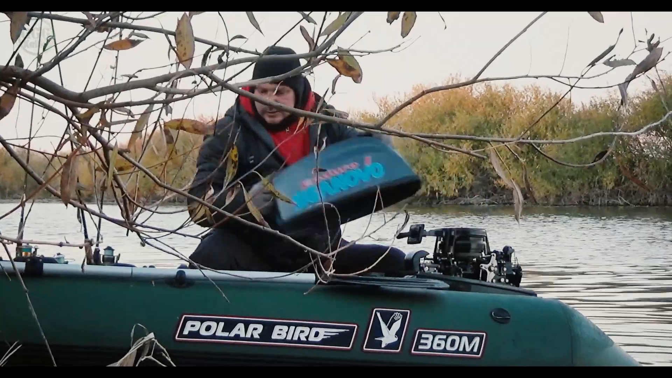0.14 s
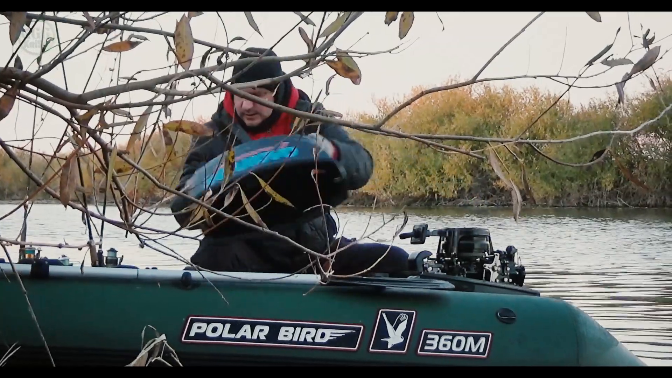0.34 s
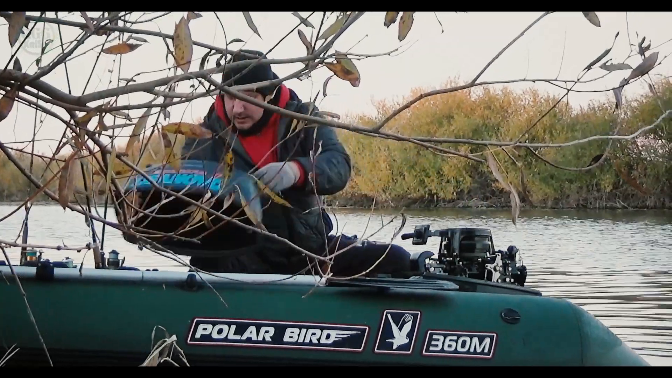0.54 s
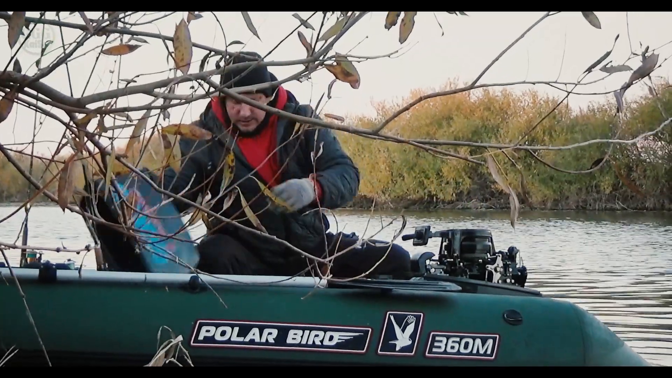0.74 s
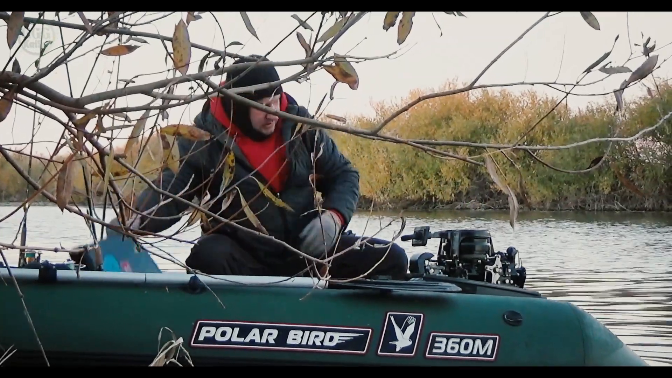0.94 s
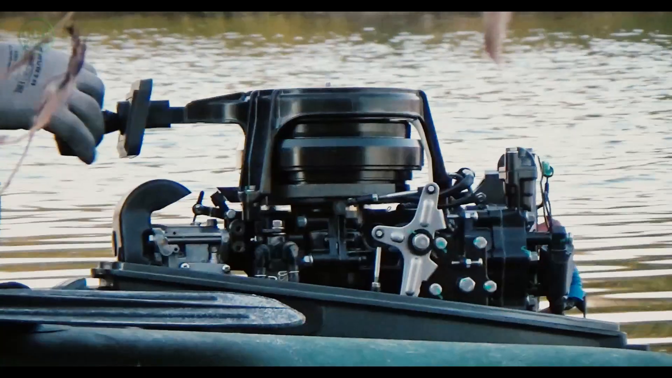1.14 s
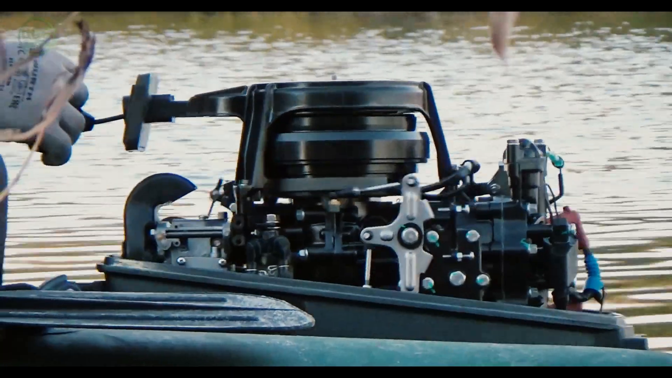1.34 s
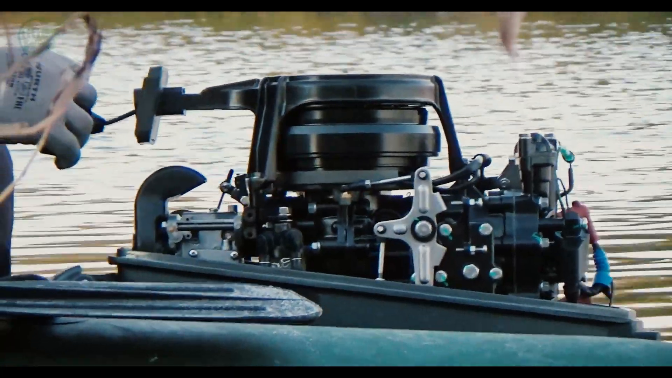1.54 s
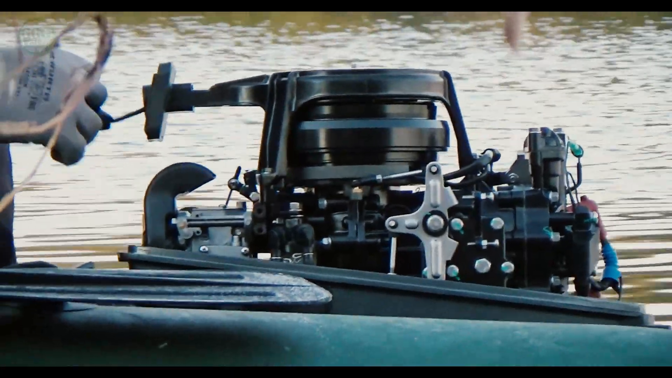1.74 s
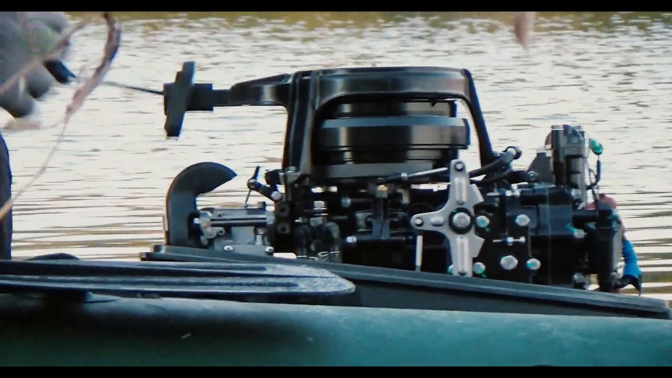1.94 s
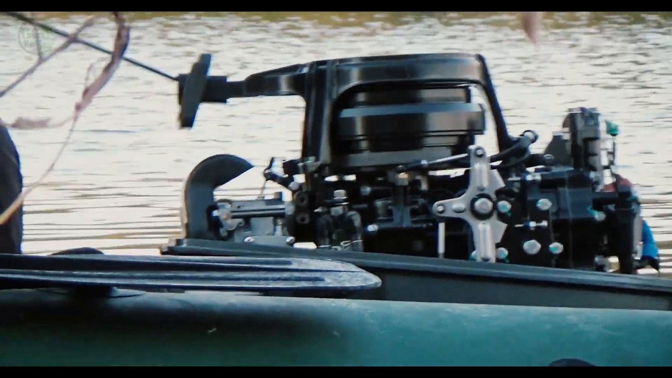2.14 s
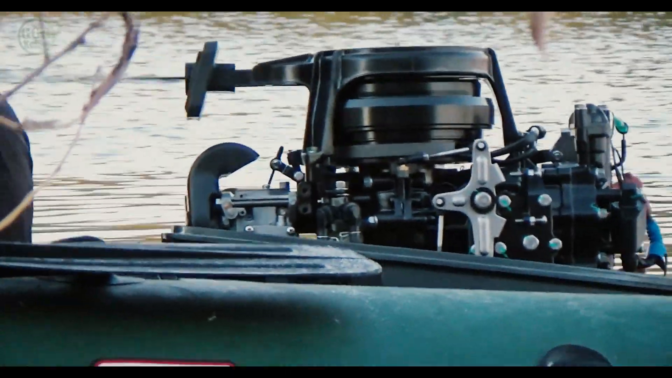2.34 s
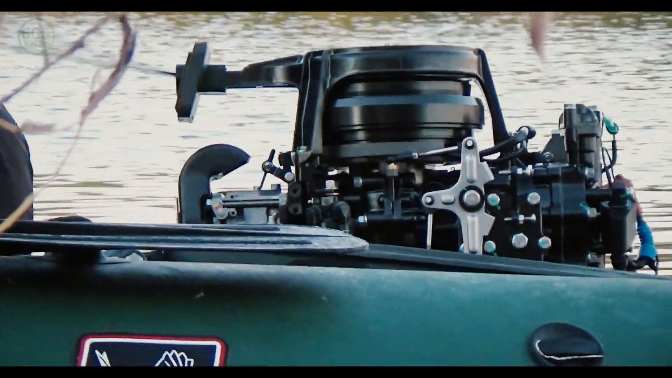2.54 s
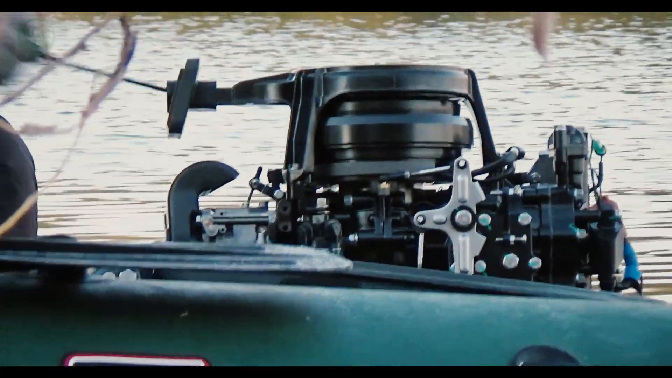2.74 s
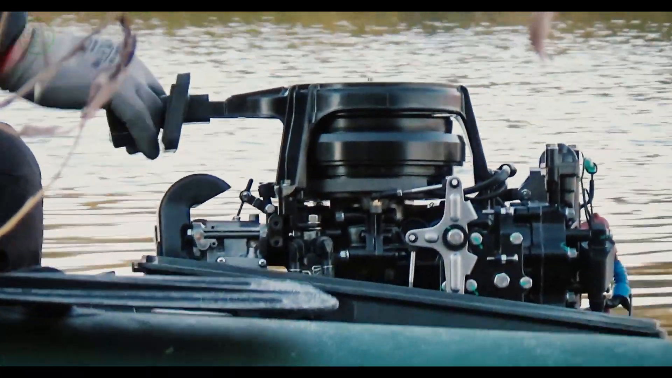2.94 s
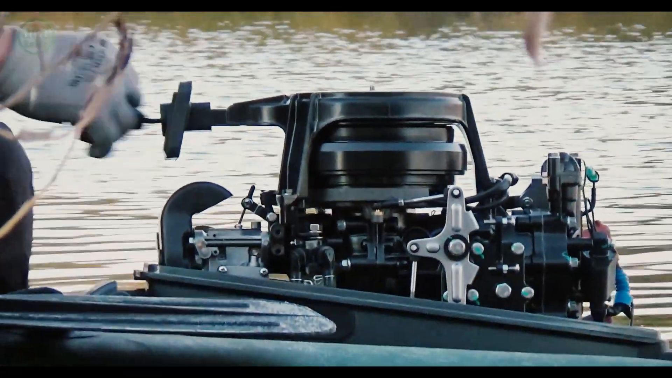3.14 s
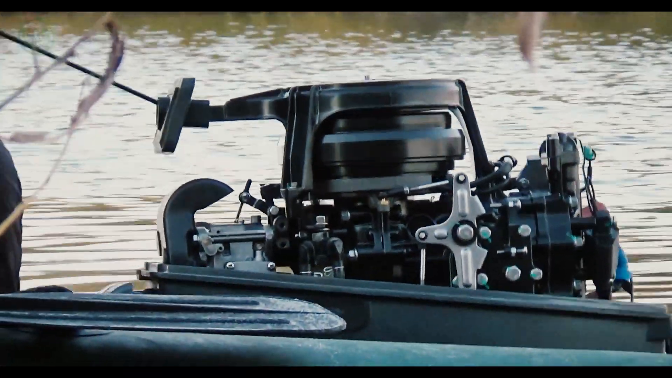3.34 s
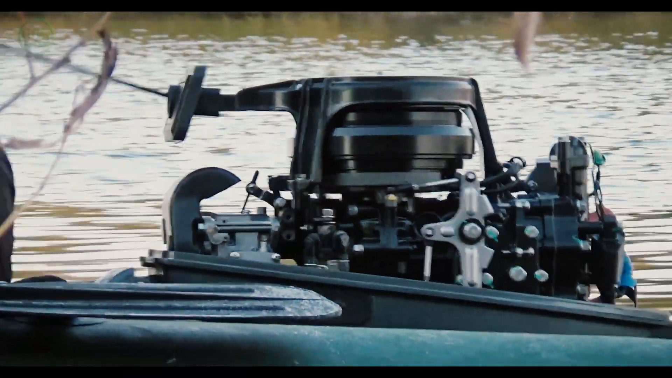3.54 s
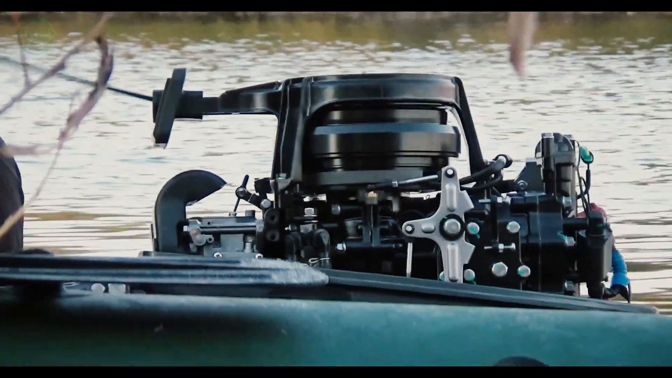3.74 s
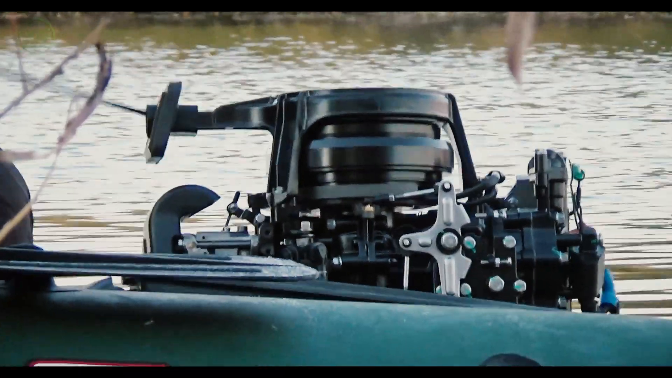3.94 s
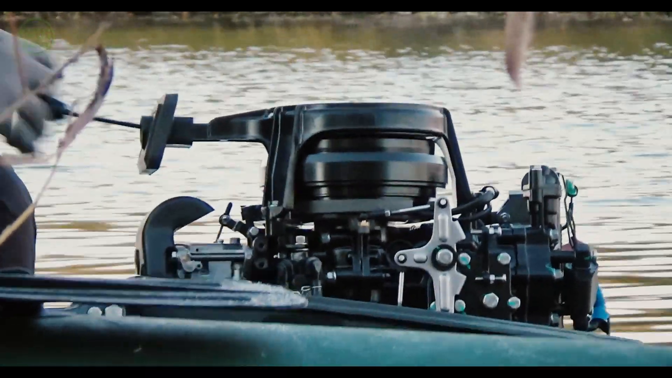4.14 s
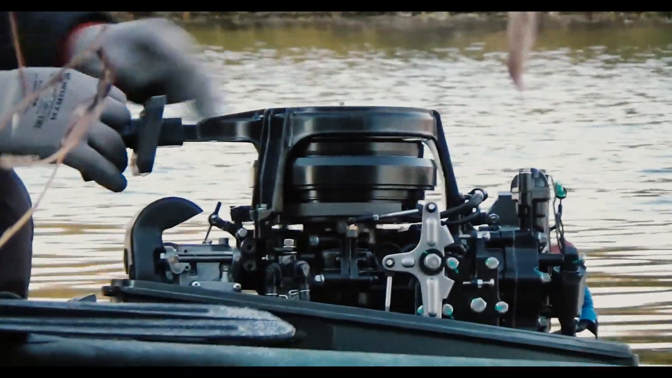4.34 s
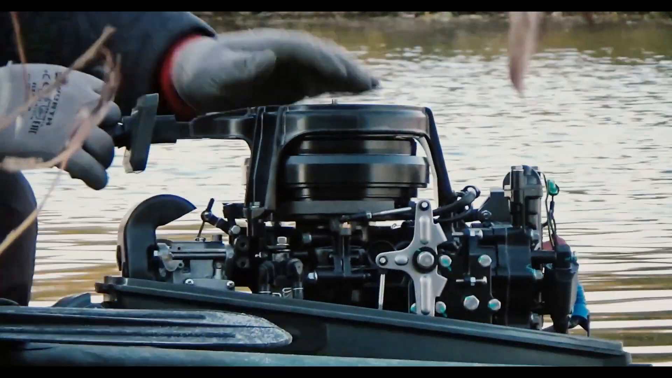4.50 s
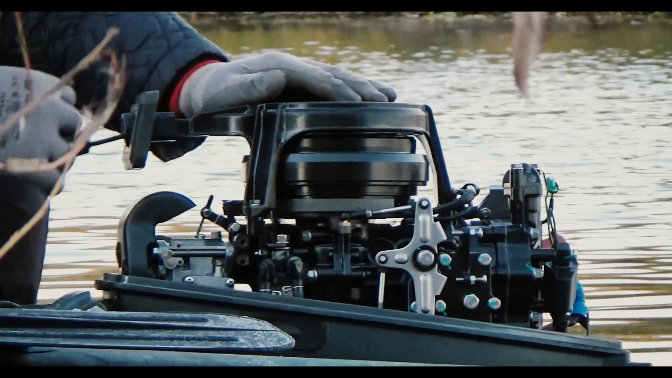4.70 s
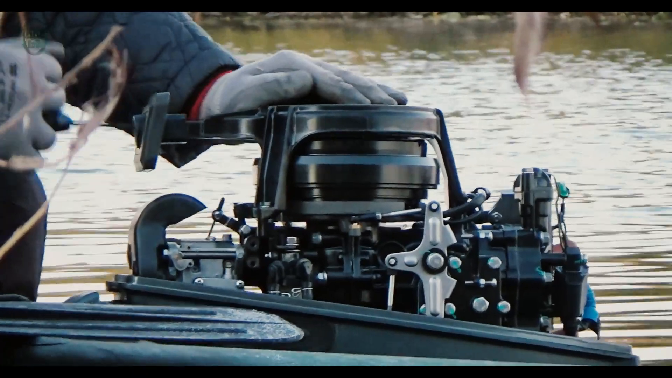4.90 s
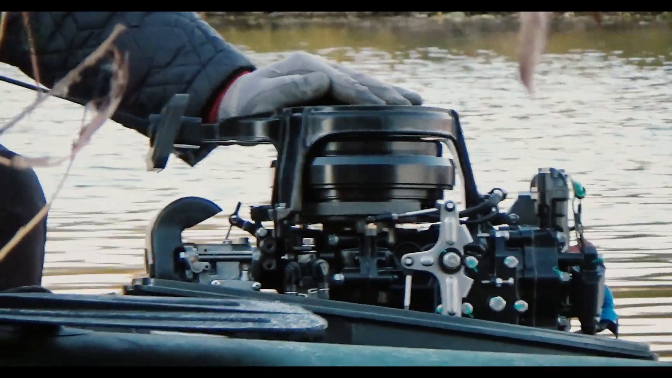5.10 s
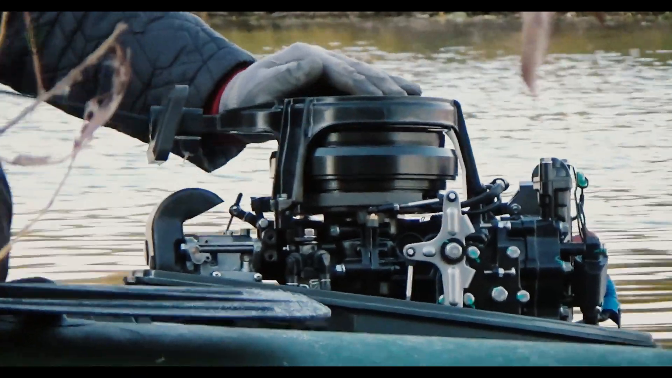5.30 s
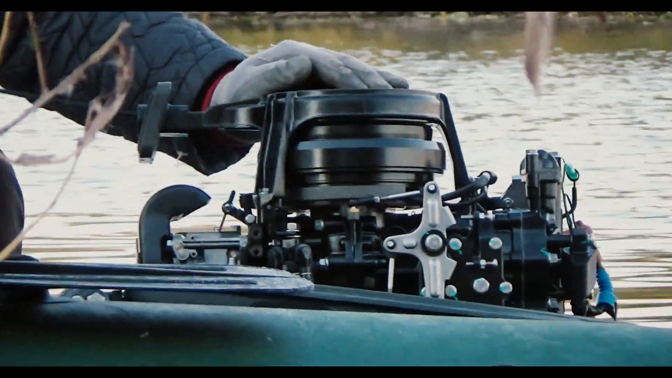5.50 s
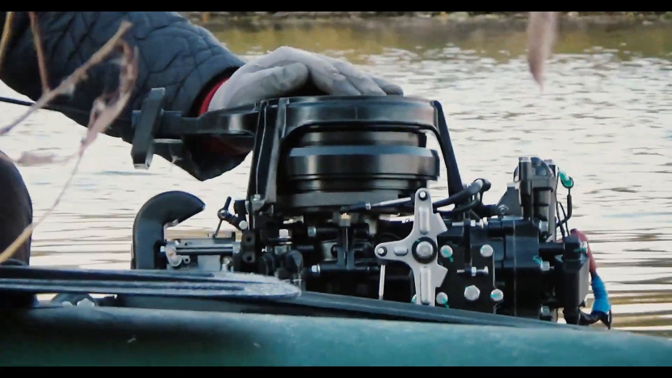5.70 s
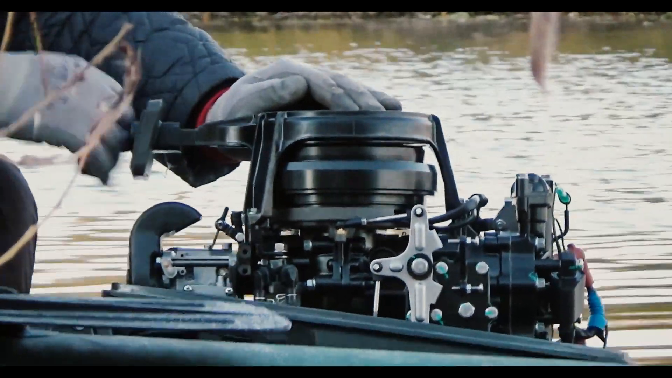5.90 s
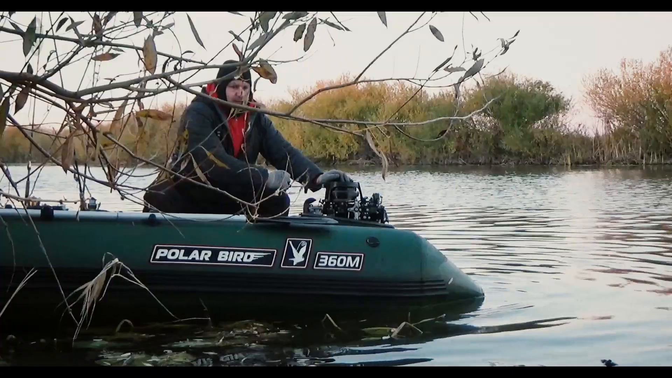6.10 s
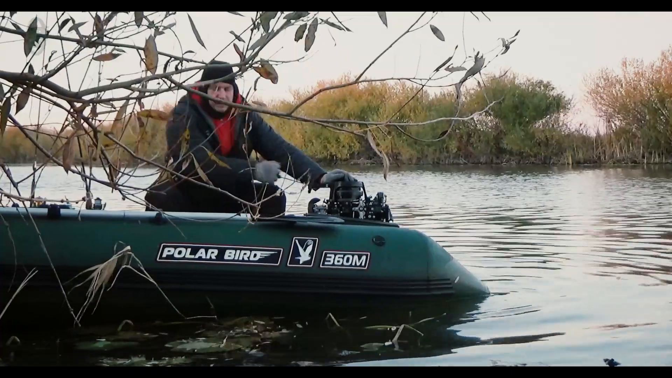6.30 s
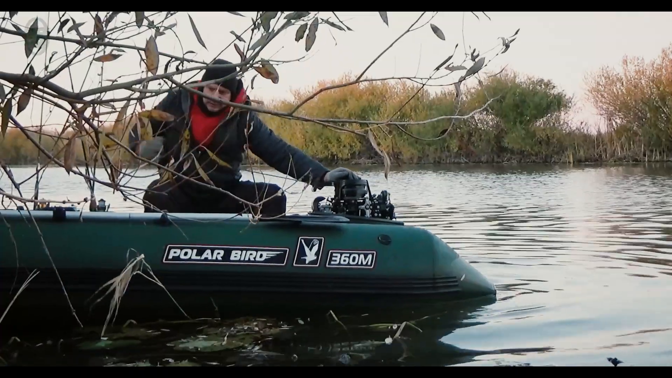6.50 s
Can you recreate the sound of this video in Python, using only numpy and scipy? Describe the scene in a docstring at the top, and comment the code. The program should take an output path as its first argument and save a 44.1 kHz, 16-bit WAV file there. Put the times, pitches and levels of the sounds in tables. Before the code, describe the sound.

Close outdoors by water, with almost no echo: jacket cloth rustles, rope ticks tight, then four gritty starter pulls follow, each ending in a bright metallic snap over compression and a rattling, weakening rewind. A hard plastic handle knock comes after the first pull, lighter knocks and clicks after the second. Loose linkages rattle, but there is no ignition, only faint river hush underneath.

```python
"""A jacket sleeve swishes over the hush of a river bank, then a small outboard motor on an inflatable boat,
its cowl laid aside, is turned over slowly by the starter rope: four pulls, and it never fires.
On each pull the rope rasps off its reel (random slips), the crank clacks and steel snaps (damped modes
and noise cracks), and air puffs hollowly through the cylinder (resonant noise).
The reel whirrs the rope back on a low, pulsing note; the rope handle knocks on the housing."""
import sys
import numpy as np
from scipy import signal
from scipy.fft import rfft, irfft, next_fast_len
from scipy.io import wavfile
from scipy.ndimage import uniform_filter1d, map_coordinates

SR = 44100
rng = np.random.default_rng(int(sys.argv[2]) if len(sys.argv) > 2 else 0)


def materialize(psi):
    """Save the field psi as 16-bit PCM at rate SR to the path in sys.argv[1].

    A 1-D psi becomes a single channel; in a 2-D psi each row is a channel.
    """
    bounded = np.clip(np.atleast_2d(psi).T, -1, 1)
    quanta = np.round(bounded * 32767).astype(np.int16)
    wavfile.write(sys.argv[1], SR, quanta)


N = 293706  # samples in the scene
HIT = SR // 3  # samples in one blow

# pulls on the rope: [t/s of compression, effort level/dB, snap level/dB, rebound delay/s, rewind length/s,
# reel turn/s, reel note f/Hz, note level/dB while drawn, on first turn back, its change per turn/dB]
PULLS = [(2.376, -1, -12.5, 0.015, 0.78, 0.11, 308.7, -60, -47.5, -4.5),
         (3.643, 2, -11, 0.016, 0.743, .119, 325, -55, -56.5, 4.5),
         (5.409, -0.5, -15, .023, 0.59, .106, 322, -62, -45, -6),
         (6.72, -3, -15, .018, .7, 0.103, 324.3, -49, -50, -4)]
# the rewinding reel first whirrs this long after compression (s), then once a turn
FIRST_TURN_S = 0.161
# gentle tugs that take up slack in the rope: [t/s of the peak, level/dB, half length/s]
TUGS = [(1.27, -63.5, .055), (1.37, -55.5, 0.039), (1.65, -67, 0.62), (2.09, -70, 0.1),
        (3.27, -59.5, 0.065), (4.27, -65.5, 0.052), (4.56, -61.5, 0.21), (5.08, -62.5, 0.13),
        (6.07, -60.5, 0.017), (6.35, -73.5, 0.059)]
# spectrum of the crack of a blow in the crank: [f/Hz, level/dB per Hz]
CRANK_CRACK = [(80, -16), (400, -12), (800, -7.5), (1050, -18.5), (1550, 2), (2600, -3.5), (3600, -10.5),
               (6000, -15.5), (9000, -8), (12000, -25.5), (16000, -45.5)]
# spectrum of the rasping rope: [f/Hz, level/dB per Hz]
ROPE = [(500, -38), (2000, -8.5), (3200, -3.5), (5500, -3.5), (7000, -1.5), (9300, -1.5), (10500, -7.5),
        (12500, -12), (16000, -23)]


def amp(db):
    """Decibels to gain."""
    return 10 ** (np.asarray(db) / 20)


def unit(x):
    """Scaled to rms 1."""
    return x / np.sqrt(np.mean(x ** 2) + 1e-20)


def along(points, hz):
    """(Hz, value) points read on a log axis."""
    f, v = np.transpose(points)
    return np.interp(np.log(hz + 1), np.log(f + 1), v)


def wobble(rate):
    """A smooth random curve, rate knots a second."""
    knots = rng.standard_normal(int(N * rate / SR) + 4)
    return map_coordinates(knots, [np.arange(N) * rate / SR])


def filtered(x, response):
    """x times a response of frequency."""
    n = x.shape[-1]
    m = next_fast_len(n + 8192)  # room for the filter to ring out
    return irfft(rfft(x, m) * response(np.fft.rfftfreq(m, 1 / SR)), m)[..., :n]


def coloured(x, spectrum):
    """x given a spectrum, at rms 1."""
    return unit(filtered(x, lambda hz: amp(along(spectrum, hz))))


def resonance(hz, centre, width):
    """Response of one causal resonance."""
    return 1j * hz * width / (centre ** 2 - hz ** 2 + 1j * hz * width)


def shelf(x, corner_hz, low_db=0, high_db=0):
    """Separate gains below and above a corner."""
    low = signal.sosfilt(signal.butter(1, corner_hz, fs=SR, output="sos"), x)
    return amp(low_db) * low + amp(high_db) * (x - low)


def add(track, s, sound):
    """Mixes a sound into the track at time s."""
    part = track[max(round(s * SR), 0):][:len(sound)]
    part += sound[:len(part)]


def fade(t60):
    """Envelope of a blow: a very quick rise and an exponential fall."""
    t = np.arange(HIT) / SR
    return np.exp(-np.log(1000) * t / t60) * (1 - np.exp(-t / .0002))


def ring(modes, length=1):
    """Damped modes, at new strengths for every blow."""
    t = np.arange(HIT) / SR
    gains = np.array([amp(db + rng.normal(0, 3.6)) for hz, db, t60 in modes])
    waves = [np.sin(2 * np.pi * (hz * t + rng.random())) * fade(t60 * length) for hz, db, t60 in modes]
    return gains @ np.array(waves) / np.linalg.norm(gains)


def crack(spectrum, length):
    """The crowd of short modes in a blow: noise in bands that each die at their own rate."""
    # decay of each band: [f/Hz, t60/s at length 1]
    dying = [(150, 0.071), (600, 0.12), (2000, 0.035), (6000, 0.034), (14000, 0.041)]
    bands, t60s = np.transpose(dying)
    hz = np.fft.rfftfreq(HIT, 1 / SR)
    z = np.exp(2j * np.pi * rng.random(len(hz))) * amp(along(spectrum, hz))
    # overlapping bands that add up to the whole spectrum
    shares = [np.interp(np.log(hz + 1), np.log(bands), row) for row in np.eye(len(bands))]
    parts = irfft([z * share for share in shares], HIT)
    parts = parts / np.sqrt(t60s)[:, None]
    return sum(part * fade(t60 * length) for part, t60 in zip(parts, t60s)) / parts.sum(0).std()


def grains(rate, spread_db):
    """Random tiny slips of uneven size, rate of them a second."""
    sizes = amp(spread_db * np.minimum(rng.standard_exponential(N), 5))
    return unit((rng.random(N) < rate / SR) * sizes * rng.standard_normal(N))


def patchy(x, depth_db):
    """Each moment of a rub wakes some modes more than others."""
    z = signal.stft(x, nperseg=256)[2]
    field = uniform_filter1d(rng.standard_normal(z.shape), size=4, axis=0)  # smooth over frequency
    field = uniform_filter1d(field, size=3, axis=1)  # and over time
    return unit(signal.istft(z * amp(depth_db * unit(field)), nperseg=256)[1][:N])


def chatter(rate, spread_db, cycles):
    """Small slips, each ringing briefly at a pitch of its own."""
    # pitches of the slips: [f/Hz, relative number]
    slip_pitches = [(400, .3), (900, .5), (1100, .2), (1600, 1.6), (2600, 1), (4000, .5), (7000, .9),
                    (9500, 1.4), (12000, .1)]
    t = np.arange(SR // 100) / SR
    when, pick, size, phase = rng.random((int(rate * N / SR), 4)).T
    grid = np.geomspace(slip_pitches[0][0], slip_pitches[-1][0], 200)
    share = np.cumsum(np.abs(along(slip_pitches, grid)))
    hz = np.interp(pick, share / share[-1], grid)[:, None]
    life = cycles / np.sqrt(hz * 2000)  # high slips die sooner
    waves = np.sin(2 * np.pi * (hz * t + phase[:, None])) * t / life * np.exp(-t / life)
    gains = amp(spread_db * np.minimum(-np.log1p(-size), 4))
    at = (when * N).astype(int)[:, None] + np.arange(len(t))
    return unit(np.bincount(at.ravel(), (gains[:, None] * waves).ravel(), N)[:N])


def swell(s, half):
    """A bell-shaped swell round time s."""
    return np.exp(-.5 * np.minimum(((np.arange(N) / SR - s) / half) ** 2, 100))


def swells(rows):
    """Gain of a series of soft movements."""
    return np.sqrt(sum((amp(db) * swell(s, half)) ** 2 for s, db, half in rows))


def stroke(peak_db, start_db, stall_db, sag_db_per_s):
    """Gain of a part moving with the rope: grows with speed, drops at compression, sags as the reel runs back."""
    # before compression: the rope bites, speeds up, is fastest; after it: stalls, runs back and stops
    bite_s, draw_s, fastest_s, stall_s, stop_s = 0.18, 0.26, .062, 0.032, .14
    out, t = np.zeros(N), np.arange(N) / SR
    for s, effort_db, _, _, rewind, *_ in PULLS:
        times = [s - draw_s - bite_s, s - draw_s, s - fastest_s, s + stall_s, s + rewind, s + rewind + stop_s]
        levels = [-45, effort_db + start_db, effort_db, stall_db, stall_db - sag_db_per_s * rewind, -60]
        moving = (t > times[0]) * (t < times[-1])
        out += amp(peak_db + np.interp(t, times, levels)) * moving
    return out


def turns_back(s, turn, count):
    """Times of the first turns of the rewinding reel after compression at s."""
    return [s + FIRST_TURN_S + k * turn for k in range(count)]


def rope_gain():
    """How hard the rope rubs on its guide."""
    pull = stroke(peak_db=-44.0, start_db=-10.5, stall_db=-9.5, sag_db_per_s=4)
    return np.hypot(pull, swells(TUGS))


def case_gain():
    """How hard the crankcase rumbles."""
    pull = stroke(peak_db=-44.5, start_db=-10.0, stall_db=-8.0, sag_db_per_s=15.5)
    return np.hypot(pull, amp(-1) * swells(TUGS))


def hush():
    """The hush of the river bank: coloured noise that drifts slowly in level."""
    # [f/Hz, level/dB per Hz], before the cut in the lows
    hush_spectrum = [(12, -34), (20, -8), (70, -6.5), (113, -14.5), (158, -15.5), (590, -15.5), (2320, -24),
                     (2750, -25.5), (2990, -22.5), (5380, -28), (8650, -26), (14300, -32), (16000, -37)]
    noise = coloured(rng.standard_normal(N), hush_spectrum)
    return shelf(noise, corner_hz=150, low_db=-16.0) * amp(-68.0 + 0.48 * wobble(3))


def sleeve():
    """The sleeve swishes on the jacket: a dense crowd of tiny slips of cloth."""
    # swishes: [t/s of the peak, level/dB, half length/s]
    swishes = [(.05, -77, 0.19), (.98, -67, 0.11)]
    # colour of the cloth: [f/Hz, level/dB per Hz]
    cloth_spectrum = [(500, -15), (3000, -16), (6500, -5), (9500, 4), (12000, -6), (16000, -13)]
    return swells(swishes) * coloured(grains(rate=7700, spread_db=1.0), cloth_spectrum)


def rumble():
    """A low rumble that grows as each pull or tug rocks the boat."""
    spectrum = [(15, -4.0), (30, -3.0), (65, -4.0), (110, -8), (200, -21.5), (400, -37), (2000, -89.5)]
    noise = coloured(rng.standard_normal(N), spectrum)
    pull = stroke(peak_db=-63.5, start_db=-3.5, stall_db=-8.5, sag_db_per_s=6)
    rocking = np.hypot(amp(-79) + amp(-14.5) * swells(TUGS), pull)
    return rocking * noise * unit(amp(3.1 * wobble(14)))


def knocks():
    """The rope handle and other plastic parts knock: housing modes and a crack, ringing longer or shorter."""
    # knocks: [t/s, level/dB, body level/dB, length factor]
    knock_rows = [(.187, -41, -4, 0.49), (1.358, -32, -2.5, 1.34), (1.894, -37, 14, 1.5),
                  (2.842, -26, 6, .6), (3.2753, -11, 2.5, 1.23), (3.278, -18.5, 7, 1), (3.289, -25, 0, .98),
                  (4.1263, -16, -4.5, 0.64), (4.172, -31, -14, 1.9), (4.187, -24.5, -9, .7),
                  (4.204, -26, -12, 0.72), (4.217, -27, -4, 0.66), (4.393, -23.5, -8, 0.62),
                  (5.841, -30.5, -4, 0.78), (5.858, -23.5, -24, 0.52)]
    # ringing of the starter housing: [f/Hz, level/dB, t60/s at length 1]
    housing_modes = [(170, -21, 0.12), (419, -2.5, .075), (614, -1.5, .06), (766, -5, 0.068),
                     (888, -7, 0.06), (1426, 2, 0.054), (1572, -2.5, 0.034), (1710, 1.5, 0.033),
                     (2260, -1.5, 0.056), (2740, -30, .045), (3140, -1.5, 0.062), (3970, -2.5, .055),
                     (4440, -7, 0.032), (8850, 5.5, .025), (9360, -5, 0.037)]
    # crack of the handle: [f/Hz, level/dB per Hz]
    handle_crack = [(60, -40.5), (200, -12.5), (600, -7.5), (1050, -11.5), (1600, -2.5), (3100, -2),
                    (3600, -10.5), (4300, -3), (6000, -7), (9200, -3), (10500, -10.5), (12500, -17.5),
                    (16000, -35)]
    out = np.zeros(N)
    for s, db, body_db, length in knock_rows:
        blow = amp(db - 8) * ring(housing_modes, length) + amp(db - 6) * crack(handle_crack, length)
        add(out, s, shelf(blow, corner_hz=1200, low_db=body_db))
    return out


def scrapes():
    """Short scrapes of rope and handle: band noise that swells and dies within hundredths of a second."""
    # scrapes: [t/s of the peak, level/dB, f/Hz, width as share of f, half length/s]
    scrape_rows = [(0.191, -53, 1700, 1.1, 0.0031), (.407, -69, 8000, .91, 0.021),
                   (1.092, -60, 2500, 1.8, 0.019), (1.696, -57, 5100, 10, 0.018),
                   (2.938, -33, 1600, .64, 0.0073), (3.011, -39, 6500, 2.7, .0052),
                   (3.264, -49.5, 2700, .65, 0.017), (3.337, -41, 8440, 0.41, 0.0075),
                   (4.128, -28, 3070, 0.93, 0.0019), (4.224, -42, 3200, 3.8, .0093),
                   (5.166, -40, 3970, 6.9, .0028), (5.971, -39, 1640, 0.79, 0.0077),
                   (6.013, -41.5, 1650, .9, 0.0082), (6.384, -48.5, 7640, .82, 0.01)]
    out, t = np.zeros(N), np.arange(HIT) / SR
    middle = t.mean()
    for s, db, centre, width, half in scrape_rows:
        def response(hz):
            """A broad resonance with the extreme treble rolled off."""
            return resonance(hz, centre, centre * width) ** 2 / (1 + (hz / 11500) ** 8)
        rub = unit(filtered(rng.standard_normal(HIT), response))
        add(out, s - middle, amp(db) * rub * np.exp(-.5 * ((t - middle) / half) ** 2))
    return out * unit(amp(2.1 * wobble(450)))  # roughness


def ticks():
    """Rope, glove and fittings tick: a decaying sine spike with a faint rattle of the touched part."""
    # ticks: [t/s, level/dB, f/Hz, t60/s of the spike, rattle level/dB re the tick]
    tick_rows = [(.329, -50, 5400, .003, -8), (1.4048, -24, 9900, 0.0011, -20.5),
                 (1.475, -44.5, 3365, .04, -4), (1.593, -44, 9800, .004, -16),
                 (2.028, -47.5, 2730, .003, -0.5), (2.1198, -33, 8500, 0.0023, -19),
                 (2.6, -30, 9000, .0024, -18), (2.668, -34.5, 6350, .0037, -6),
                 (2.852, -30.5, 9240, 0.0072, -1.5), (3.027, -33, 10000, .0037, -8),
                 (3.045, -28.5, 7600, 0.0021, -11), (3.218, -38, 5500, .0085, -7),
                 (3.625, -23, 2780, .005, -22), (3.75, -33.5, 2920, .0036, -0.5),
                 (4.128, -26.5, 4400, 0.028, -22), (4.2616, -17, 11000, .001, -22),
                 (4.334, -32, 6700, .005, -7.5), (4.826, -41.5, 3730, 0.0064, -10.5),
                 (5.164, -35, 5860, .0022, -14), (5.3376, -23, 7100, .0023, -14),
                 (5.741, -28, 3950, .0025, -9), (5.7669, -27, 6350, .0016, -2.5),
                 (5.8586, -26.5, 3730, 0.016, -18), (5.872, -24, 1510, 0.012, -24),
                 (5.896, -26, 9200, 0.0013, -22), (6.098, -43.5, 7000, .0027, 0)]
    out, t = np.zeros(N), np.arange(HIT) / SR
    for s, db, hz, t60, rattle_db in tick_rows:
        spike = np.sin(2 * np.pi * hz * t) * fade(t60) / fade(t60).max()
        add(out, s, amp(db) * spike + amp(db + rattle_db) * crack(ROPE, length=0.6))
    return out


def bumps():
    """Soft contacts on the boat and the motor wake only a low, broad resonance."""
    # bumps: [t/s, level/dB before a 3 dB cut, f/Hz, t60/s]
    bump_rows = [(.55, -60.5, 55, 0.25), (.609, -52, 576, .056), (1.076, -38, 96, 0.17),
                 (1.077, -41, 420, 0.22), (1.45, -37.5, 487, .11), (1.897, -40.5, 232, 0.073),
                 (2.934, -31.5, 400, 0.048), (3.283, -26.5, 400, 0.038), (3.285, -36.5, 161, 0.089),
                 (3.769, -29, 500, 0.078), (4.129, -33.5, 388, 0.078), (4.18, -27, 365, 0.038),
                 (4.66, -45, 524, 0.074), (4.799, -36, 825, 0.056), (5.773, -35, 615, .07),
                 (6.198, -50, 278, .12), (6.457, -37.5, 340, 0.05), (6.612, -39, 115, 0.078)]
    out = np.zeros(N)
    for s, db, centre, t60 in bump_rows:
        body = filtered(rng.standard_normal(HIT), lambda hz: resonance(hz, centre, centre * 0.99) ** 2)
        push = unit(body * fade(t60)) * fade(t60).std()
        add(out, s, amp(db - 3.0) * push)
    return out


def starter():
    """Rope fibres catch and slip on the guide while the turning reel grinds in the crankcase."""
    # colour of the crankcase: [f/Hz, level/dB per Hz]
    case_spectrum = [(30, -18.5), (70, -4.5), (120, -2), (300, 5), (440, -0.5), (530, -6.5), (800, 3.5),
                     (950, -4), (1300, -6.5), (1540, -2.5), (1800, -0.5), (2600, -3), (3500, -12.5),
                     (6000, -28), (16000, -74)]
    rub, grind = rope_gain(), case_gain()
    catch = wobble(90)  # the rope runs in short jerks
    rope = patchy(coloured(grains(rate=14000, spread_db=0.3), ROPE), depth_db=4)
    rope = rope * unit(amp(1.77 * catch + 1.7 * wobble(300)))
    case = patchy(coloured(grains(rate=7000, spread_db=1.0), case_spectrum), depth_db=3.5)
    case = case * unit(amp(1.6 * catch + 2.6 * wobble(70)))
    slips = chatter(rate=420, spread_db=4.5, cycles=1.85) * unit(amp(0.88 * catch))
    return amp(1.84) * rub * rope + amp(1.6) * grind * case + amp(-0.5) * np.sqrt(rub * grind) * slips


def fibres(count=45):
    """Faint, brief ticks come at random as the rope runs over its guide."""
    out, rub, t = np.zeros(N), rope_gain(), np.arange(HIT) / SR
    spike = fade(0.0027) / fade(0.0031).max()
    for when, size, pitch in rng.random((count, 3)):
        hz = 3000 + 7000 * pitch
        gain = rub[int(when * N)] * amp(13 + 9 * size)
        add(out, when * N / SR, gain * spike * np.sin(2 * np.pi * hz * t))
    return out


def rattle(count=260):
    """Loose linkages tick at random, as hard as the crank is turning."""
    out, grind = np.zeros(N), case_gain()
    for when, size, bright in rng.random((count, 3)):
        blow = shelf(crack(CRANK_CRACK, length=.45), corner_hz=3000, high_db=10.6 * bright)
        add(out, when * N / SR, grind[int(when * N)] * amp(18.5 * size - 3.5) * blow)
    return out


def puffs(first_db, change_db, half, count=3):
    """Gain of the puffs after compression, one to a turn of the reel."""
    rows = []
    for s, _, _, _, _, turn, *_ in PULLS:
        rows += [(at, first_db + change_db * k, half) for k, at in enumerate(turns_back(s, turn, count))]
    return swells(rows)


def cylinder():
    """The piston pushes air through hollow passages in soft puffs, each resonance wavering on its own."""
    # resonances of the air passages: [f/Hz, width/Hz before broadening, level/dB]
    passages = [(306, 45, -8.5), (442, 34, -10.5), (625.3, 32, -5.5), (749, 55, -2.5)]
    air = np.zeros(N)
    for hz, width, db in passages:
        hollow = unit(filtered(rng.standard_normal(N), lambda f: resonance(f, hz, 1.5 * width) ** 2))
        air += amp(db) * hollow * unit(amp(5.0 * wobble(22)))
    flow = stroke(peak_db=-51.0, start_db=-4.5, stall_db=-3, sag_db_per_s=16.5)
    return np.hypot(flow, puffs(first_db=-48, change_db=-3.5, half=0.016)) * unit(air)


def reel(count=3):
    """The sprung reel judders on its post once a turn, twice as drawn, then rewinding: a low note that pulses."""
    out = np.zeros(N)
    drift = np.cumsum(1 + 0.0139 * wobble(45)) / SR  # seconds, running slightly unevenly
    flutter = amp(1.3 * wobble(70))
    for s, *_, turn, hz, drawn_db, back_db, change_db in PULLS:
        phase = 2 * np.pi * hz * drift
        turns = [(s - turn, drawn_db), (s - 2 * turn, drawn_db)]
        turns += [(at, back_db + change_db * k) for k, at in enumerate(turns_back(s, turn, count))]
        gain = sum(amp(db + 4.5) * swell(at, half=0.01) for at, db in turns)
        out += gain * (np.sin(phase) + amp(-10) * np.sin(2 * phase))
    return out * flutter


def clacks(count=2):
    """Oily crank parts take up play with short, dull, soft-edged clacks; the pawl adds one on each first turn back."""
    # play in crank and starter pawl: [t/s, level/dB, treble level/dB]
    clack_rows = [(2.1455, -35, 2), (2.2134, -28.5, -6), (2.3022, -18, -4), (2.3211, -27.5, 10),
                  (2.3474, -30, -7), (2.4613, -21.5, -11), (2.4907, -22.5, -18), (2.9347, -27.5, -16),
                  (2.9672, -26, -2), (3.4306, -30, 5), (3.489, -32.5, 9), (3.5683, -15, -9),
                  (3.5784, -20.5, 3), (3.702, -27, 1), (3.7544, -32.5, 6), (3.8003, -29, 5),
                  (3.8272, -32, -5), (5.3228, -21.5, 5), (5.3444, -25, 11), (5.3594, -29, -6),
                  (5.3817, -25.5, -7), (5.4565, -32.5, 10), (5.4755, -37, 12), (5.9683, -28.5, -8),
                  (6.0142, -29, -14), (6.6119, -26.5, -14)]
    # ringing of the crank: [f/Hz, level/dB, t60/s at length 1]
    crank_modes = [(438, -10.5, 0.059), (629, -15, 0.083), (832, -13.5, 0.057), (1530, 0, 0.029),
                   (1830, -0.5, 0.025), (1880, -6, 0.012), (2244, -9.5, 0.043), (2800, -28, 0.025)]
    # the pawl's clack: time ahead of the whirr (s), level and treble (dB)
    pawl_lead_s, pawl_db, pawl_treble_db = 0.013, -34, 5
    pawl = []
    for s, _, _, _, _, turn, *_ in PULLS:
        pawl += [(at - pawl_lead_s, pawl_db, pawl_treble_db) for at in turns_back(s, turn, count)]
    out = np.zeros(N)
    rise = 1 - np.exp(-np.arange(HIT) / SR / 0.0014)
    for s, db, treble_db in [*clack_rows, *pawl]:
        blow = amp(db) * ring(crank_modes, length=0.81) + amp(db - 8.0) * crack(CRANK_CRACK, length=1.0)
        add(out, s, shelf(blow * rise, corner_hz=4100, high_db=treble_db))
    return out


def snaps():
    """Steel strikes steel as the crank goes over compression and rebounds once; one high mode sings on."""
    # ringing of the steel: [f/Hz, level/dB, t60/s]
    steel_modes = [(768, -9, 0.053), (2260, -9, 0.05), (2754, 4, 0.052), (2903, 2.5, 0.024),
                   (3990, -5, 0.031), (5600, -13, .035), (6490, -7, 0.16), (7210, 5, 0.033),
                   (7500, -11, 0.027), (10930, -7.5, 0.058)]
    # crack of the steel: [f/Hz, level/dB per Hz]
    steel_crack = [(100, -19), (1200, -26), (1800, -2), (2800, -1), (3500, 1), (5200, -4), (7200, 1.5),
                   (8100, -1), (10500, -4.5), (12000, -16), (16000, -29)]
    rebound_db = -14  # relative to the snap
    out = np.zeros(N)
    for s, _, snap_db, rebound, *_ in PULLS:
        for at, db in (s, snap_db), (s + rebound, snap_db + rebound_db):
            add(out, at, amp(db - 8) * ring(steel_modes) + amp(db - 6) * crack(steel_crack, length=0.74))
    return out


def surroundings(x, wet_db, t60):
    """Boat, water and bushes scatter a faint tail of decaying noise."""
    tail = shelf(rng.standard_normal(HIT), corner_hz=3020, high_db=-8.0) * fade(t60)
    return amp(wet_db) * signal.fftconvolve(x, tail / np.linalg.norm(tail))[:N]


def scene():
    """Everything reaches one close microphone, alike in both channels."""
    turning = starter() + cylinder() + reel() + rattle() + fibres()
    contacts = scrapes() + snaps() + clacks() + knocks() + ticks() + bumps()
    motor = turning + contacts
    bank = hush() + rumble() + sleeve()
    mono = motor + surroundings(motor, wet_db=-16.0, t60=0.13) + bank
    return np.array([mono, mono])


def record(dry):
    """The recorder cuts off very steeply at its band limit."""
    top_hz = 16000
    return filtered(dry, lambda hz: 1 / np.sqrt(1 + (hz / top_hz) ** 160))


dry = scene()
out = record(dry)
materialize(out)
```